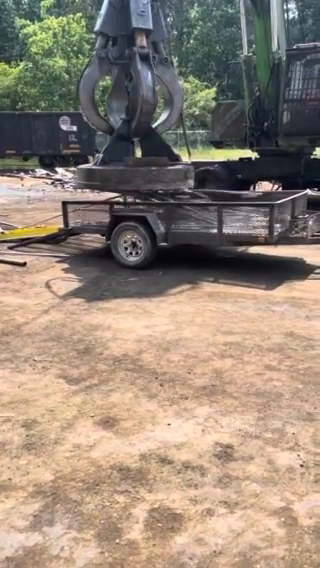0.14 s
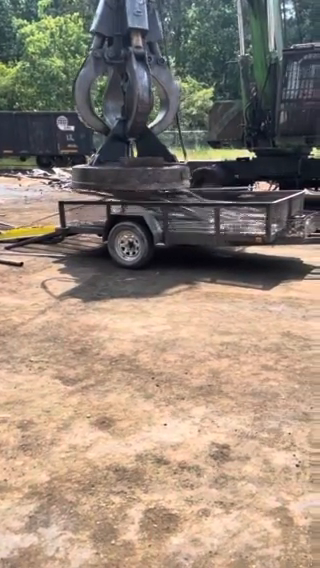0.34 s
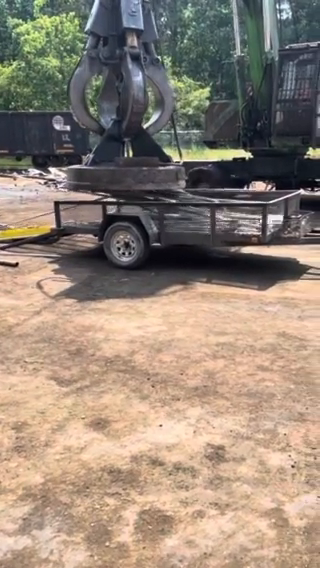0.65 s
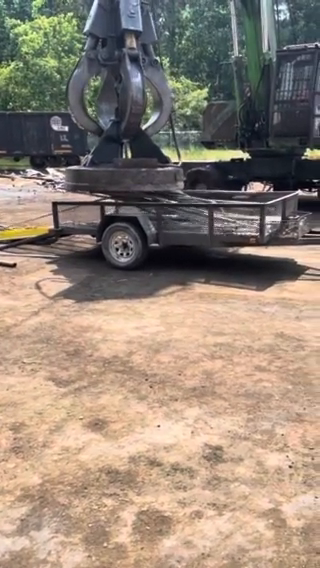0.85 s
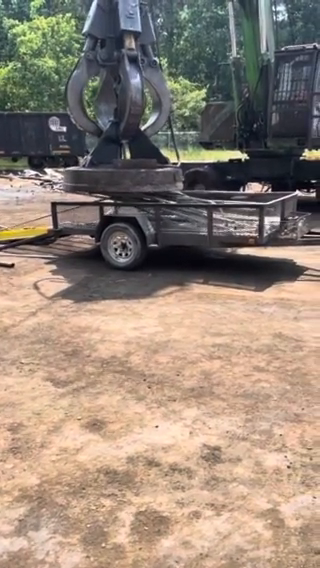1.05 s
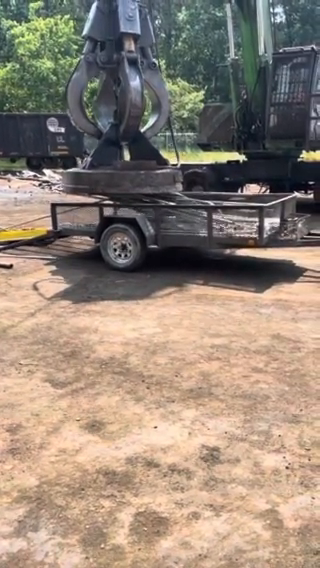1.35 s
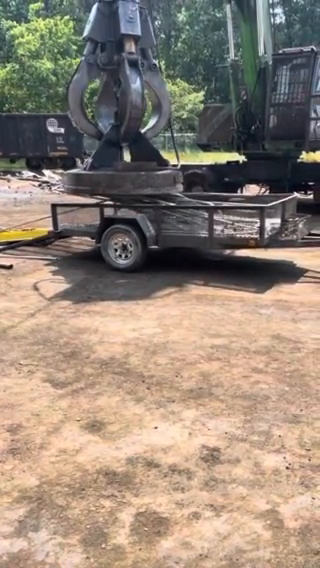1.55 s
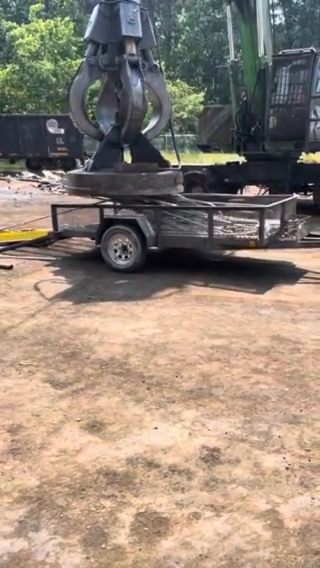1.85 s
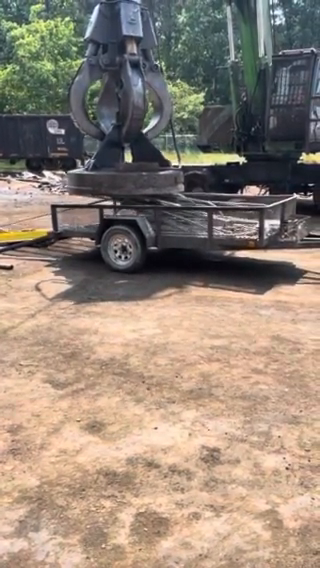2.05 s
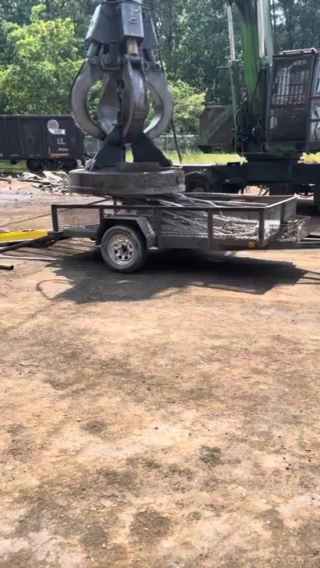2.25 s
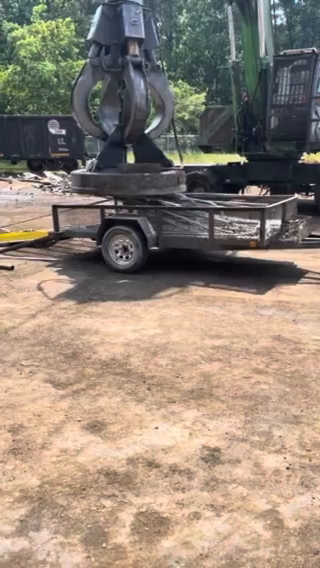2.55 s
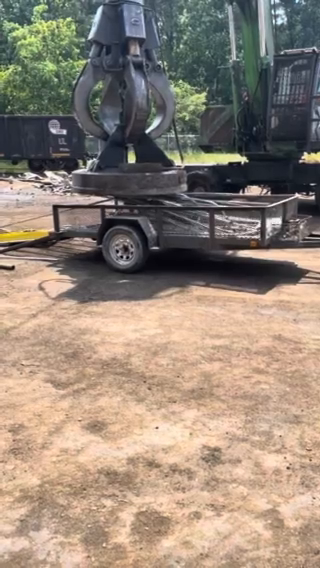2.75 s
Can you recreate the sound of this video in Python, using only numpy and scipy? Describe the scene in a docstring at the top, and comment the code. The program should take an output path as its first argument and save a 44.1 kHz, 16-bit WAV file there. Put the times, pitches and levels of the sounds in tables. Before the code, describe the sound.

Scrap steel clanks and rattles loudly under a crane magnet on a trailer, dense at first, then thinning to separate knocks and a later burst; low diesel hum beneath, open yard, short echoes, fairly close stereo microphone.

```python
"""Outdoors, at a small mesh trailer of scrap steel, a crane's lifting magnet presses on the load.
Pieces clank and ring: each blow is decaying contact noise plus damped modes, with an echo from the yard.
Loose bits rattle as random pings on scraping noise; the crane's diesel hums and rumbles as tones and
puffed noise. Two microphone ports hear it in shifted phase and at levels that vary with frequency."""
import sys
import numpy as np
from scipy import signal
from scipy.fft import rfft, irfft, next_fast_len
from scipy.io import wavfile
from scipy.ndimage import uniform_filter1d, map_coordinates

SR = 44100
rng = np.random.default_rng(int(sys.argv[2]) if len(sys.argv) > 2 else 0)


def waveform_to_disk(signal):
    """Save audio, clipped to [-1, 1], as 16-bit WAV at the path in sys.argv[1]."""
    frames = np.transpose(np.atleast_2d(signal))
    scaled = np.clip(frames, -1, 1) * 32767
    samples = np.round(scaled).astype(np.int16)
    wavfile.write(sys.argv[1], SR, samples)


N = 127449

# Spectrum shape of steel on steel, before any tilt: f/Hz, density level/dB per Hz
STEEL_SPECTRUM = [(200, -44), (450, -5.5), (900, -2.5), (2000, 0.5), (4000, -4.5), (6500, -8.5),
                  (8600, -18.5), (9100, -9), (12000, -22), (15500, -28)]


def amp(db):
    """Level to gain: 20 dB is a factor of ten in amplitude."""
    return 10 ** (np.asarray(db) / 20)


def unit(x):
    """Normalisation to a root-mean-square value of 1."""
    return x / np.sqrt(np.mean(x ** 2) + 1e-20)


def along(points, hz):
    """Interpolation of (f/Hz, value) points on a logarithmic frequency axis."""
    f, v = np.transpose(points)
    return np.interp(np.log(hz + 1), np.log(f + 1), v)


def curves(rows):
    """Linear interpolation in time: one value per sample for each column after t/s."""
    knots_s, *columns = np.transpose(rows)
    t = np.arange(N) / SR
    return [np.interp(t, knots_s, column) for column in columns]


def wobble(rate):
    """Slow random modulation: a smooth curve through Gaussian knots, rate of them per second."""
    knots = rng.standard_normal(int(N * rate / SR) + 4)
    return map_coordinates(knots, [np.arange(N) * rate / SR])


def filtered(x, response):
    """Linear filtering: the spectrum of x times a complex response of frequency."""
    n = x.shape[-1]
    m = next_fast_len(n + 4096)
    spectrum = rfft(x, m) * response(np.fft.rfftfreq(m, 1 / SR))
    return irfft(spectrum, m)[..., :n]


def tone(hz):
    """Phase as the integral of frequency: a sine of rms 1 that follows a pitch curve."""
    cycles = np.cumsum(hz) / SR + rng.random()
    return np.sqrt(2) * np.sin(2 * np.pi * cycles)


def clanks():
    """Superposition of impacts: every blow on every piece, each with its own echo from the yard."""
    # Steel pieces by name: (rise time constant/ms, crash t60/s, modes, blows)
    # modes: f/Hz, level/dB, t60/s before choking
    # blows: t/s, crash level/dB before a common 7 dB cut, tilt/dB per octave, ring level/dB re crash
    pieces = { "plate": (3, 0.16, [(1184, -15.5, 1), (1620, 2, 0.04), (1895, 1, 0.063)],
              [(0.0696, -8.5, 3, -15), (0.0894, -19, 9, -13), (0.139, -6.5, 2, 2.5), (0.1564, -9.5, 0, -32),
              (0.2552, -9.5, 0.5, -17), (0.2697, -6, 3.5, -11), (0.2994, -7.5, 3.5, -19)]),
              "rod": (0.77, 0.18, [(4070, 2, 0.19), (3800, -3, 0.2)], [(0.3485, -12, 2, -1),
              (0.4772, -15.5, -1, -10), (0.6159, -15.5, 2, -11), (1.1612, -31, -2, -10),
              (1.5942, -25, -4.5, -11), (1.7129, -29, -3.5, -16)]), "deck": (3.1, 0.1, [(510, -2.5, 0.22),
              (655, -2, 0.13), (1142, -8, 0.5), (1353, -0.5, 0.15)], [(0.309, -17.5, 1, 2),
              (0.582, -11.5, -3, -6.5), (0.626, -19.5, -11.5, 2.5), (0.654, -25, -9, 3.5),
              (0.919, -16, -3, -5.5), (1.016, -21, -4.5, -19), (1.404, -24.5, -1.5, -21),
              (1.447, -21.5, -3, -18)]), "pipe": (1, 0.17, [(1015, -3.5, 0.39), (1288, 4, 0.051),
              (1560, -7, 0.87), (1990, 8.5, 0.041), (2362, 4.5, 0.047), (2980, -5, 0.17), (3731, -3, 0.073),
              (5320, -9.5, 1)], [(0.7964, -20.5, -2.5, -3), (0.827, -9, 2, -2.5), (1.2694, -23, -2, 4.5),
              (1.3742, -29, 1.5, -4)]), "bar": (0.56, 0.12, [(2264, -1, 0.17), (2544, 5, 0.054),
              (2715, 4.5, .15), (2886, 2.5, 0.085), (4830, -4, 0.12), (4990, -2, 0.17), (5660, -5, 0.19)],
              [(0.9114, -22.5, 3, -6), (1.2134, -24.5, -2.5, -11), (1.229, -6.5, 2.5, -3.5),
              (1.2894, -20, 0.5, -10.5), (1.8965, -36, 0.5, -17), (2.2856, -19, 2, -10.5),
              (2.4737, -23.5, 4, -27)]), "sheet": (2.9, 0.11, [(2034, -7, 0.15), (2500, 0.5, 0.077),
              (2790, 2, 0.054), (3314, -2.5, 0.041), (4150, -4.5, 0.058), (5165, -20, 0.55)],
              [(2.1514, -17, 3, -8), (2.159, -10.5, -0.5, 3.5), (2.1808, -6.5, 1.5, -3.5),
              (2.3874, -19.5, 0.5, -13), (2.4023, -18, -2, 0.5)]), "hook": (5.7, 0.13, [(2025, -4.5, 0.18),
              (2190, -6, 0.19), (2579, -1.5, 0.24)], [(2.3325, -18, -0.5, 5.5), (2.348, -21.5, -2, 2),
              (2.4244, -25.5, -6, 4.5)]), "chip": (1.5, 0.1, [(2395, 1.5, 0.048), (3020, -1, 0.032)],
              [(2.0257, -27.5, -4, 9.5)]), "rail": (1.7, 0.12, [(480, -0.5, 0.068), (675, 5, 0.059),
              (860, 8.5, 0.027), (1384, 6.5, 0.041), (2860, -0.5, 0.062)], [(2.7387, -9.5, 2.5, -9),
              (2.7474, -17.5, -7, -2.5), (2.8359, -23, -3.5, -17)]), }
    echo_db = -5
    out = np.zeros((2, N + 2 * SR))
    for rise_ms, t60, modes, blows in pieces.values():
        for start_s, *how in blows:
            direct = blow(modes, rise_ms, t60, *how)
            echo = amp(echo_db) * yard(direct)
            from_start = out[:, round(start_s * SR):]
            from_start[:, :len(direct)] += direct
            from_start[:, :echo.shape[1]] += echo
    return out[:, :N]


def blow(modes, rise_ms, t60, db, tilt_db, ring_db, count=55):
    """Impact excitation: a contact crash with neighbouring modes, and the piece's own damped modes."""
    t = np.arange(SR // 5) / SR
    rise = 1 - np.exp(-t / (max(rise_ms, .2) / 1000))
    crash = contact_crash(t, t60, tilt_db, count)
    ring = modal_ring(t, modes)
    return amp(db - 7.0) * rise * (crash + amp(ring_db) * ring)


def contact_crash(t, t60, tilt_db, count):
    """Broadband contact: chattering noise and a thicket of stray modes, the treble damped faster."""
    treble_damping, crack = 0.066, 0.25  # extra decay rate above 4 kHz; extra strength of first contact
    chatter_db = 1.6 * rng.standard_normal(len(t) // 64 + 1).repeat(64)[:len(t)]
    chatter = rng.standard_normal(len(t)) * amp(chatter_db)
    noise = chatter + stray_modes(t, t60, count)

    def colour(f):
        return amp(along(STEEL_SPECTRUM, f) + tilt_db * np.log2(np.maximum(f, 450) / 2500))

    noise = filtered(noise, colour)
    noise = noise / np.std(noise[:SR // 50])
    low = filtered(noise, lambda f: 1 / (1 + (f / 4000) ** 2))
    high = noise - low
    crash = low * amp(-60 * t / t60) + high * amp(-60 * t * (1 + treble_damping) / t60)
    return crash * (1 + crack * amp(-20 * t / 0.0025))  # the crack is 40 dB down in 5 ms


def stray_modes(t, t60, count):
    """Sympathetic vibration: random damped modes of neighbouring scrap, 900 Hz to 12.6 kHz."""
    stray_db, life_scale_s = -5, 0.13  # level before colouring; scale of the random t60
    pitch, phase, life = rng.random((count, 3)).T[:, :, None]
    waves = np.sin(2 * np.pi * (900 * 14 ** pitch * t + phase)) * 2 ** pitch
    # the crash decay applied later is undone here, so each mode's own decay remains below 4 kHz
    decay = amp(60 * t / t60 - 60 * t / (life_scale_s * (0.12 + life)))
    stray = (waves * decay).sum(0)
    return amp(stray_db) * stray / np.std(stray[:SR // 100])


def modal_ring(t, modes):
    """Modal superposition: decaying modes build up, buzz, and are choked when a neighbour touches."""
    buzz, choke_s, bloom = .45, .095, .04  # roughness; time of 10 dB choking; build-up constant / t60
    hz, level_db, life = np.transpose(modes)[:, :, None]
    slow = rng.standard_normal((2, len(modes), len(t)))
    slow = unit(uniform_filter1d(uniform_filter1d(slow, 300), 300))
    roughness = 1 + buzz * (slow[0] + 1j * slow[1])  # random amplitude and phase modulation
    waves = np.imag(roughness * np.exp(2j * np.pi * hz * t))
    decay = amp(level_db - 60 * t / life - 10 * (t / choke_s) ** 4)
    build_up = 1 - np.exp(-t / (bloom * life))
    return (decay * build_up * waves).sum(0)


def yard(x):
    """Diffuse scattering off trailer, crane and wagons: each frequency dies at its own speed."""
    # Reverberation of the yard: f/Hz, t60/s
    echo_decay = [(300, 0.87), (2000, 0.16), (10000, 0.24)]
    noise = rng.standard_normal((2, SR // 3))
    hz, t, z = signal.stft(noise, SR, nperseg=256)
    z = z * amp(-60 * t / along(echo_decay, hz)[:, None])
    tail = signal.istft(z, SR, nperseg=256)[1]
    delayed = np.pad(x, (400, 0))[None]  # 9 ms before the first return
    return signal.fftconvolve(delayed, tail / np.linalg.norm(tail[0]), axes=1)


def rattle(count=3500):
    """Random superposition of micro-impacts: pings of random pitch on a bed of scraping noise."""
    # Loose bits: t/s, level/dB before flicker and tilt, nominal tilt/dB per octave
    rattle_course = [(0, -24.5, 3.5), (.24, -30.5, 0), (.4, -26.5, -0.5), (.56, -31, -3.5),
                     (.75, -31.5, -2.5), (.97, -35.5, -3), (1.08, -47.5, -2), (1.4, -38, -7),
                     (1.55, -47.5, -6), (2.12, -54.5, -8), (2.37, -43, -4), (2.56, -53.5, -5),
                     (2.89, -43, -2)]
    u, t = rng.random((count, 4)), np.arange(1300) / SR
    hz = 500 * 30 ** u[:, 1:2]
    life = (0.036 + 0.12 * u[:, 2:3] ** 3) * np.clip(4000 / hz, 0, 1)  # a third of t60, in s
    strength = amp(13.4 * u[:, 3:] ** 2) * np.sqrt(hz / 1000 / life)
    pings = strength * np.sin(2 * np.pi * hz * t) * amp(-60 * t / (3 * life))
    where = (u[:, :1] * N).astype(int) + np.arange(len(t))
    all_pings = unit(np.bincount(where.ravel(), pings.ravel())[:N])
    scraping = 1.45 * rng.standard_normal((2, N))
    x = unit(filtered(all_pings + scraping, lambda f: amp(along(STEEL_SPECTRUM, f))))
    db, tilt_db = curves(rattle_course)
    # three bands, parted near 1500 and 6000 Hz, approximate a tilt that changes in time
    low = filtered(x, lambda f: 1 / (1 + (f / 1500) ** 4))
    high = filtered(x, lambda f: 1 - 1 / (1 + (f / 6000) ** 4))
    middle = x - low - high
    tilted = low * amp(-1.5 * tilt_db) + middle + high * amp(1.57 * tilt_db)
    flicker_db = 1.5 * wobble(30)
    return amp(db + flicker_db) * tilted


def engine():
    """Periodic combustion: wavering tones over noise, the rumble puffed once a firing."""
    return engine_hz_and_noise(99.37)


def engine_hz_and_noise(firing_hz):
    """Line spectrum plus amplitude-modulated noise, around the mean firing frequency in Hz."""
    # Firing tone, mean course: t/s, level/dB
    hum_course = [(0, -38), (.17, -24.5), (.51, -24), (.6, -39), (.69, -37), (.74, -26), (1.0, -23.5),
                  (1.59, -20), (1.74, -22.5), (1.775, -37), (1.8, -24.5), (1.86, -33.5), (1.89, -27),
                  (2.05, -19.5), (2.35, -17.5), (2.89, -19.5)]
    # Companion tones, mean values: multiple of firing frequency, level/dB
    companions = [(0.501, -45.5), (1.8, -39.5), (2.01, -46.5)]
    # A low tone that sinks: t/s, f/Hz, mean level/dB
    sinking_tone = [(1.7, 84.8, -39), (2.0, 82.2, -32.5), (2.89, 68.2, -42.5)]
    # Rumble spectrum shape: f/Hz, density level/dB per Hz
    rumble_spectrum = [(30, -43.5), (45, -10.5), (120, -9.5), (237, -17), (410, -20), (649, -17.5),
                       (760, -26.5), (1350, -28.5), (2630, -47), (6000, -52), (12000, -120)]
    # Rumble course before its random swell: t/s, level/dB
    rumble_course = [(0, -28), (1.1, -32), (2.0, -30), (2.89, -29)]
    # Hiss spectrum shape: f/Hz, density level/dB per Hz
    hiss_spectrum = [(1500, -26), (3000, 2), (6000, 10.5), (9500, 2), (12000, -2.5), (15500, -19)]
    hiss_db = -60

    hum_db, = curves(hum_course)
    hz = firing_hz + .5 * wobble(4.88)
    lines = amp(hum_db + 0.34 * wobble(45)) * tone(hz)
    for multiple, line_db in companions:
        line_hz = multiple * firing_hz + 2 * wobble(11)
        lines = lines + amp(line_db + 2.5 * wobble(10)) * tone(line_hz)
    sink_hz, sink_db = curves(sinking_tone)
    lines = lines + amp(sink_db + 2.8 * wobble(8.6)) * tone(sink_hz)

    noise = rng.standard_normal((4, N))
    puffs = 1 + 0.13 * tone(hz)
    rumble = unit(filtered(noise[:2] * puffs, lambda f: amp(along(rumble_spectrum, f))))
    hiss = unit(filtered(noise[2:], lambda f: amp(along(hiss_spectrum, f))))
    rumble_db = curves(rumble_course)[0] + 1.2 * wobble(6)
    return lines + amp(rumble_db) * rumble + amp(hiss_db) * hiss


def scene():
    """Linear superposition: clanking and rattling scrap over the engine."""
    return clanks() + rattle() + engine()


def record(dry):
    """Two-port reception: a shared sound with phase and level differences, then the band limit."""
    # Gain on what the ports do not share: f/Hz, gain
    unshared_gain = [(150, 0.0081), (800, 0.14), (1800, 0.13), (2500, 1.29), (3800, .3), (6100, 1.14),
                     (7000, 0.051), (8300, 0.05), (9200, 0.46), (10400, 0.76), (11700, 0), (12600, 0.69),
                     (13800, 0.23)]
    # Right port's phase lead: f/Hz, lead/half turns
    phase_lead = [(2100, 0), (2500, 1), (3100, 1.65), (3700, 2), (5400, 2), (6000, 1.65), (6900, 1),
                  (8400, 1), (9100, .55), (10200, 0), (11800, 0), (12600, -.45), (13700, -1)]
    # Left port's level over the right's: f/Hz, level/dB
    level_difference = [(350, 0), (700, 2), (1200, 3.8), (2000, 3.5), (2500, -3), (3200, 4), (3900, -1),
                        (5000, 0)]
    top_hz = 15620  # middle of the 200 Hz wide cutoff ramp
    mid = (dry[0] + dry[1]) / 2
    side = filtered((dry[0] - dry[1]) / 2, lambda f: np.clip(along(unshared_gain, f), 0, 3))
    lead_hz, turn = np.transpose(phase_lead)

    def ports(hz):
        # each port takes half of the difference, in opposite senses
        phase = np.exp(-.5j * np.pi * np.interp(hz, lead_hz, turn))
        left = amp(along(level_difference, hz) / 2) * phase
        band_limit = np.clip((top_hz - hz) / 200 + .5, 0, 1) ** 2
        return np.array([left, 1 / left]) * band_limit

    return filtered(np.array([mid + side, mid - side]), ports)


dry = scene()
out = record(dry)
waveform_to_disk(out)
```